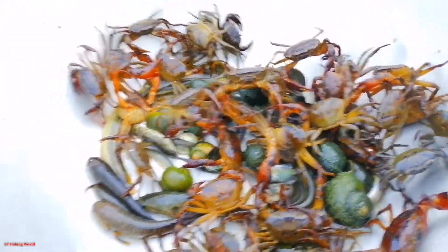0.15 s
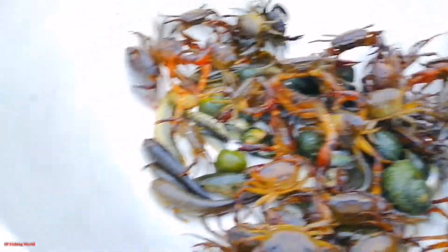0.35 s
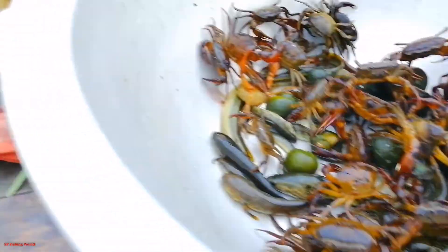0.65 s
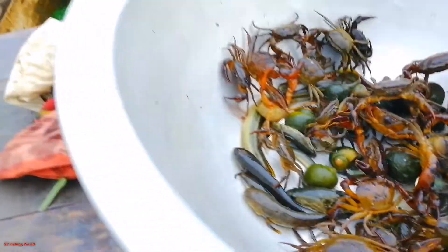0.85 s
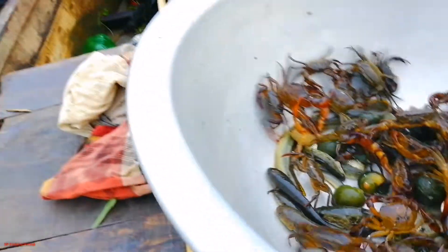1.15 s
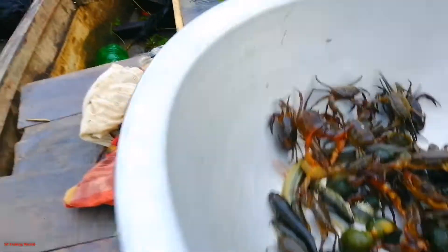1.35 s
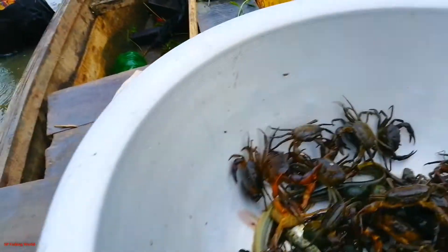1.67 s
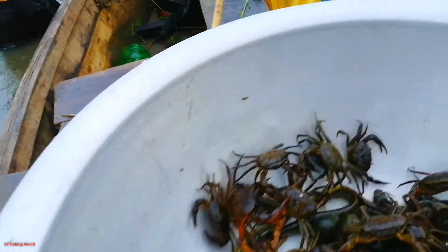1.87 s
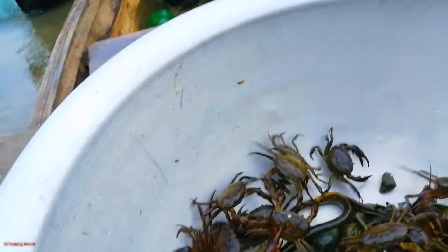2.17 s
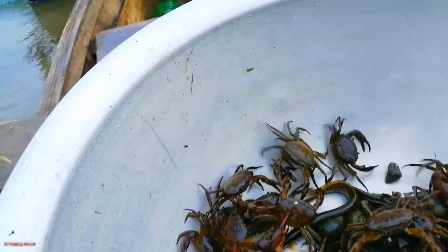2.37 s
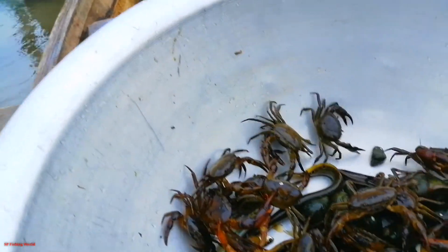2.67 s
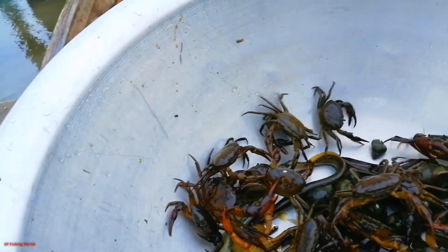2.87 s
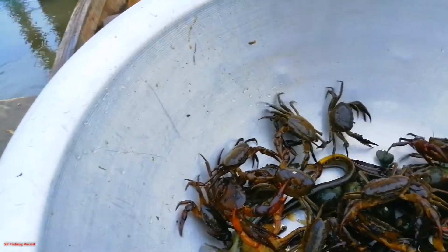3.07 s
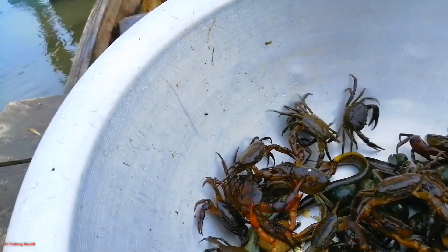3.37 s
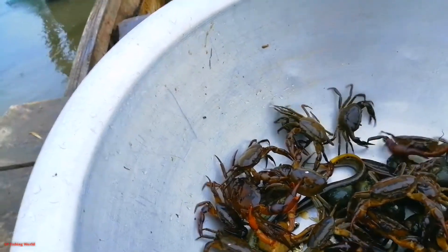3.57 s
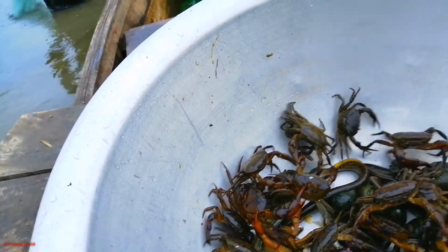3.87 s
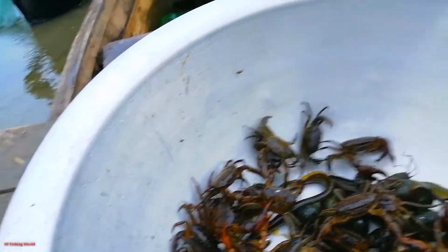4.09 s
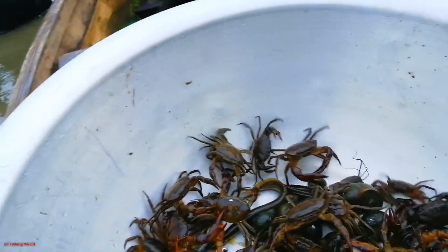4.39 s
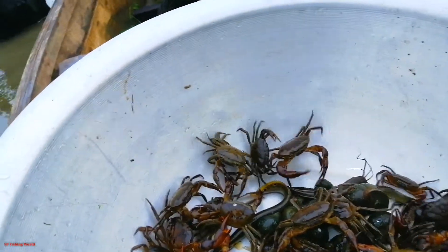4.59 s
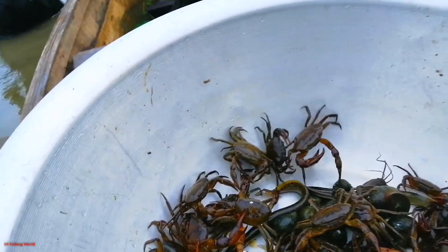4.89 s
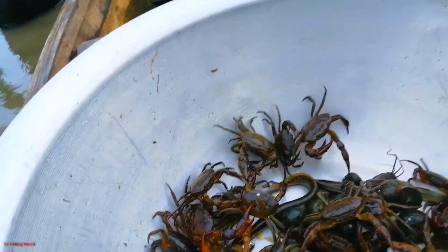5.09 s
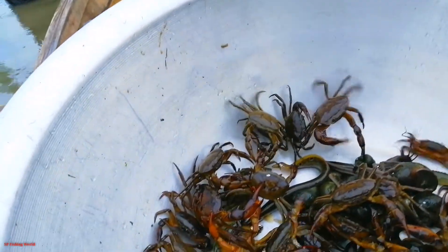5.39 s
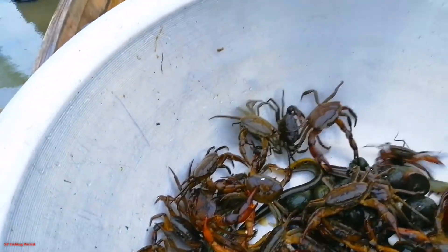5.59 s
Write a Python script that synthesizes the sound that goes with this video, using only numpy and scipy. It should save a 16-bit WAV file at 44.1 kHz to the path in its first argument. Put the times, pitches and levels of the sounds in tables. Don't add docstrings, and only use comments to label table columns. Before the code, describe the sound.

Live crabs tick and skitter inside a thin ringing tub while something heavy scrapes and bumps on wooden planks, then one hard slam rings.

```python
import sys
import numpy as np
from scipy import signal
from scipy.fft import rfft, irfft, dct, next_fast_len
from scipy.io import wavfile
from scipy.ndimage import uniform_filter1d

SR = 44100
rng = np.random.default_rng(int(sys.argv[2]) if len(sys.argv) > 2 else 0)


def volts(x):
    e = np.asarray(x, float) / 20
    return 10 ** e


def dump(signal):
    limited = np.clip(np.atleast_2d(signal).T, -1, 1)
    pcm = np.round(limited * 32767).astype(np.int16)
    wavfile.write(sys.argv[1], SR, pcm)


N = 253134


def rms_one(x):
    return x / np.sqrt(np.mean(x ** 2) + 1e-20)


def in_time(rows):
    s, *columns = np.transpose(rows)
    return [np.interp(np.arange(N) / SR, s, column) for column in columns]


def at_hz(points, hz):
    table_hz, values = np.array(points)[:, 0], np.array(points)[:, 1]
    return np.interp(np.log(np.maximum(hz, 1)), np.log(table_hz), values)


def panned(db):
    return volts(np.multiply.outer([.5, -.5], db))


def drift(rate):
    r = np.exp(-80 * np.pi * rate / SR)
    noise = rng.standard_normal(N // 40 + 2002)
    slow = signal.lfilter([1], [1, -2 * r, r * r], noise)[2000:]
    return np.interp(np.arange(N) / 40, np.arange(len(slow)), rms_one(slow))


def grains(per_s, spread_db, clump_db):
    signs = rng.choice([-1, 1], N)
    sizes = volts(spread_db * np.minimum(rng.exponential(1, N), 4)) * signs
    chance = per_s * volts(clump_db * drift(25.0)) / SR
    return sizes * (rng.random(N) < chance)


def evened(x, seconds):
    power = uniform_filter1d(np.mean(x ** 2, axis=0), int(seconds * SR))
    return x / np.sqrt(power + 0.096 * np.mean(x ** 2))


def coloured(x, spectrum):
    size = next_fast_len(N)
    gain = volts(at_hz(spectrum, np.fft.rfftfreq(size, 1 / SR)))
    return irfft(rfft(x, size) * gain, size)[..., :N]


def resonant(x, peaks):
    out = 0
    for k, (hz, width, level_db) in enumerate(peaks):
        r = np.exp(-np.pi * width / SR)
        poles = [1, -2 * r * np.cos(2 * np.pi * hz / SR), r * r]
        ring = signal.lfilter(np.array([1, 0, -1]) * (1 - r * r) / 2, poles, x)
        out = out + (-1) ** k * volts(level_db) * ring
    return out


def stereo(mid, side, alike):
    alike = np.clip(alike, -1, 1)
    shared = np.sqrt(1 + alike) * mid
    opposed = np.sqrt(1 - alike) * side * [[1], [-1]]
    return (shared + opposed) / np.sqrt(2)


# f/Hz, level/dB
WALL_MODES = [(1500, -27), (2200, -6), (2450, -6), (3150, -2), (3700, 0), (4300, -1.5), (5200, -1.5),
              (7000, -13.5)]
# f/Hz, level/dB, time to fall 60 dB (t60)/s
RIM_MODES = [(2482, -2, 0.14), (2440, -14.5, 0.1)]


def wall_modes(t60, count=130):
    hz = np.geomspace(1700, 7000, count) * rng.normal(1, 0.0036, count)
    decay = t60 * np.sqrt(3000 / hz) * volts(rng.normal(0, 1.0, count))
    rim_hz, rim_db, rim_t60 = np.transpose(RIM_MODES)
    gain = volts(np.r_[at_hz(WALL_MODES, hz), rim_db])
    hz, decay = np.r_[hz, rim_hz], np.r_[decay, rim_t60]
    t = np.arange(int(.2 * SR)) / SR
    ringing = np.exp(np.outer(2j * np.pi * hz - np.log(1000) / decay, t)).imag
    return hz, gain, ringing


def struck_at(gains, ringing, alike):
    mid, side = rng.standard_normal((2, len(gains)))
    return stereo(mid, side, alike) * gains @ ringing


def wall_strikes(rows, t60, shell):
    hz, gain, ringing = wall_modes(t60)
    length = ringing.shape[1]
    out, t = np.zeros((2, N + length)), np.arange(length) / SR
    bright = signal.butter(2, [4500, 10500], "band", fs=SR, output="sos")
    chatter_s, chatter_db = .025, -9
    for s, peak_db, ring_hz, pan_db, crack_db in rows:
        apart = np.log(hz / ring_hz)
        focus = .15 if shell else .7
        focus = focus + 0.56 * np.exp(-(apart / 0.16) ** 2) + 1.13 * np.exp(-(apart / 0.058) ** 2)
        ring = struck_at(gain * focus, ringing, 0.23)
        ring = ring * (1 + 1.17 * volts(-60 * t / 0.055)) * np.clip(t / 0.00076, 0, 1)
        touches = np.zeros(length)
        if shell:
            later = rng.random(size=4)
            touches[(later * chatter_s * SR).astype(int)] = volts(-5.5 + chatter_db * later)
        touches[0] = 1
        ring = signal.oaconvolve(ring, touches[None])[:, :length]
        crack = signal.sosfilt(bright, rng.standard_normal((2, length))) * volts(-60 * t / .035)
        strike = ring / np.abs(ring).max() + volts(crack_db - 3.0) * crack
        at = round(s * SR)
        out[:, at:at + length] += volts(peak_db + 1.0) * strike * panned(pan_db)[:, None]
    return out[:, :N]


def blows(rows, rise_cycles, split, wobble):
    out, t = np.zeros((2, N + SR)), np.arange(SR // 4) / SR
    place_db = in_time(DRAG_EFFORT)[1]
    for s, peak_db, hz, t60 in rows:
        pair = np.sin(2 * np.pi * hz * t) + .5 * np.sin(2 * np.pi * hz * (1 + split) * t)
        shape = pair * (1 - np.exp(-(t * hz / rise_cycles) ** 2)) * volts(-60 * t / t60)
        flutter = rms_one(uniform_filter1d(rng.standard_normal(len(t)), size=int(.02 * SR)))
        shape = shape * (1 + wobble * flutter * np.clip(t / .015, 0, 1))
        at = round(s * SR)
        gains = volts(peak_db) * panned(place_db[at])
        out[:, at:at + len(t)] += np.outer(gains, shape / np.abs(shape).max())
    return out[:, :N]


# t/s, level/dB, skidding re ticking/dB, left-right/dB, busiest spot f/Hz
LEG_BUSTLE = [(0.0, -46, 0.5, -3, 2856), (0.3, -48.5, -6.5, -4, 2835), (0.7, -51, -3.5, -5, 2854),
              (0.93, -47.5, -7.5, -9, 2986), (1.15, -54, -6, -6, 3300), (1.3, -42.5, -3, -6.5, 3277),
              (1.75, -45.5, -2, -3, 3090), (2.1, -37.5, -6, -4, 3193), (2.36, -48.5, -1, -1.5, 3221),
              (3.2, -43.5, -7, 0, 3245), (3.38, -42.5, -8, -1.5, 3180), (3.5, -34.5, -11.5, -2.5, 3280),
              (3.76, -37, -9.5, -3.5, 2938), (3.99, -49, -3, -4, 3256), (5.1, -52, -5.5, -5, 3122),
              (5.5, -41.5, -6.5, -6, 3320), (5.58, -46.5, -1, -5.5, 3185), (5.74, -46.5, -2.5, -6, 3315)]
# f/Hz, width/Hz, level/dB
WALL_HUM = [(537, 79, -0.5), (588.6, 59, 1), (648, 34, -4.5), (854, 27, -14.5)]
# f/Hz, level per Hz/dB
SKID_COLOUR = [(2350, -75), (4000, -5), (6180, -7), (7440, -8.5), (8450, -12.5), (9220, -11.5),
               (13100, -26), (16000, -37)]


def scrabble():
    level_db, skid_db, pan_db, busiest_hz = in_time(LEG_BUSTLE)
    hz, gain, ringing = wall_modes(t60=0.041)
    ticking = grains(1400.0, spread_db=3.5, clump_db=1.5)
    spots_hz = np.geomspace(2400, 4200, 9)
    wander = .11 * rng.standard_normal(N) + .03 * drift(8.0) - .035
    dealt = np.clip(np.searchsorted(spots_hz, busiest_hz * np.exp(wander)), 0, 8)
    ring = 0
    for k, spot_hz in enumerate(spots_hz):
        focus = .15 + np.exp(-(np.log(hz / spot_hz) / .09) ** 2)
        focus[-len(RIM_MODES):] += 0.24
        spot_ring = struck_at(gain * focus, ringing, 0.079)
        ring = ring + signal.oaconvolve((ticking * (dealt == k))[None], spot_ring)[:, :N]
    ring = signal.sosfilt(signal.butter(4, 2280, "high", fs=SR, output="sos"), ring)

    rough = np.sqrt(signal.lfilter([.004], [1, -.996], ticking ** 2) + 0.025)
    hiss = coloured(rough * stereo(*rng.standard_normal((2, N)), 0.017), SKID_COLOUR)

    shuffle = [grains(600.0, spread_db=4.0, clump_db=2.0) for _ in range(2)]
    hum = stereo(*resonant(shuffle, WALL_HUM), 1.0)
    hum_gain = volts(-70 + level_db - level_db.mean())
    shaking = volts(in_time(DRAG_EFFORT)[0]) + 0.59 * strokes()[0]
    hum_gain = hum_gain + volts(-5) * shaking

    bright = volts(2.47 * drift(10.1)) * evened(ring, 0.1)
    bright = bright + volts(skid_db + 2.16 * drift(26.4)) * evened(hiss, 0.12)
    return (volts(level_db + 4.0) * bright + hum_gain * evened(hum, 0.28)) * panned(pan_db)


# t/s, level/dB, left-right/dB of the place
DRAG_EFFORT = [(0.0, -52, 6), (0.38, -60.5, -7), (0.8, -59, 6), (1.19, -49, -21), (1.3, -37.5, -10),
               (1.48, -39.5, -12), (1.54, -46, -8.5), (1.76, -48, -12.5), (1.86, -42, -8),
               (1.984, -36.5, -4.5), (2.3, -57, -2), (2.55, -55.5, 13.5), (3.26, -56.5, -1.5),
               (3.6, -58.5, -4), (4.52, -59.5, -13.5), (4.89, -50.5, -17.5), (5.27, -61.5, -14),
               (5.74, -51, -14)]
# f/Hz, width/Hz, level/dB
PLANK_MODES = [(872, 164, -6), (1054, 69, 0), (1250, 170, -11), (1637, 156, 4), (1703, 316, -1),
               (2204, 17, -7)]
# f/Hz, width/Hz, level/dB
HULL_MODES = [(207, 29, 1.5), (259.4, 70, 1.5), (314, 71, 1.5), (432, 60, -3)]


def drag():
    rasp_db, t = in_time(DRAG_EFFORT)[0], np.arange(N) / SR
    skim_db = -10.5 * np.exp(-((t - 1.2) / 0.25) ** 2)
    settle_db = 10 * np.exp(-((t - 2.02) / 0.22) ** 2)
    rumble_db = rasp_db - 5.5 + settle_db + skim_db
    body, top = strokes()
    slips = np.array([grains(900.0, spread_db=2.5, clump_db=3.0) for _ in range(2)])

    broad = signal.sosfilt(signal.butter(2, [700, 2300], "band", fs=SR, output="sos"), slips)
    rasp = evened(stereo(*(resonant(slips, PLANK_MODES) + 0.36 * broad), 0.25), 0.13)

    grit_colour = [(1100, -40), (1800, -21), (2600, -5), (3400, 0.0)] + list(SKID_COLOUR[2:])
    grit = slips + 0.49 * rng.standard_normal((2, N))
    grit = evened(coloured(grit, grit_colour), 0.05)

    thuds = resonant(slips[::-1], [(260, 265, 0)])
    rumble = evened(stereo(*resonant(thuds, HULL_MODES), 0.48), .07)

    rasp_gain = volts(rasp_db + 3.3 * drift(5.9)) + body
    rumble_gain = volts(rumble_db + 2.0) + 0.24 * body
    return (rasp_gain * rasp + top * grit + rumble_gain * rumble) * panned(-4.5)[:, None]


# t/s, level/dB
WIND_LEVEL = [(0.0, -55.5), (0.78, -67), (1.29, -71), (2.62, -60), (3.07, -54.5), (3.21, -63.5),
              (3.84, -68), (3.97, -63), (5.1, -54), (5.4, -66), (5.74, -62.5)]
# f/Hz, level per Hz/dB
WIND_TONE = [(12, -67), (20, 0.5), (59, 2), (91, -1.5), (166, -8.5), (259, -27.5), (310, -14), (390, -85)]


def wind():
    lumps = volts(1.58 * np.array([drift(4.1), drift(12.0)]))
    flutter = rms_one(lumps * coloured(rng.standard_normal((2, N)), WIND_TONE))
    return volts(in_time(WIND_LEVEL)[0] + 8.0) * flutter * volts([[-2.5], [2.5]])


# t/s, peak level/dB, f/Hz, t60/s
WOOD_BUMPS = [(.05, -39, 187, 0.062), (1.07, -48, 134, 0.047), (1.238, -29.5, 183, 0.038),
              (1.245, -30.5, 393, 0.03), (1.325, -40, 247, 0.066), (1.405, -34.5, 236, 0.27),
              (1.44, -48, 243, 0.078), (1.508, -26.5, 453, 0.1), (1.555, -26, 370, 0.056),
              (1.6, -28, 240.4, 0.13), (1.64, -30.5, 349, 0.17), (1.793, -21, 354, 0.064),
              (1.81, -25.5, 122, 0.083), (1.877, -20.5, 320, 0.057), (1.897, -23.5, 267, 0.061),
              (1.928, -28, 288, 0.019), (1.962, -16.5, 279, 0.054), (1.98, -22, 599, 0.17),
              (2.004, -13.5, 250, 0.025), (2.036, -20.5, 256, 0.03), (2.064, -22, 237, 0.023),
              (2.23, -27.5, 273, 0.036), (2.355, -32.5, 242, 0.013), (2.452, -27, 276.4, 0.046),
              (2.48, -37.5, 257, 0.1), (2.817, -44.5, 584, 0.038), (3.48, -41, 305, 0.092),
              (4.715, -28, 269, 0.024)]


def bumps():
    return blows(WOOD_BUMPS, rise_cycles=1.41, split=0.211, wobble=.2)


# t/s, peak level/dB, loudest f/Hz, left-right/dB
LEG_TICKS = [(0.0717, -36, 3020, -0.5), (0.0893, -31, 2600, -4.0), (0.1544, -33, 2930, -1),
             (0.2994, -35, 3120, -4.0), (0.3394, -34, 3800, -6), (0.5294, -36, 2850, -5.5),
             (0.5711, -35, 3040, -7.0), (0.6794, -34, 2830, -8), (0.7996, -38, 3620, -6.5),
             (0.8315, -38, 3180, -6), (0.8804, -36, 2500, -6.0), (0.9144, -37, 3220, -7.0),
             (0.954, -34, 3290, -6.0), (1.1423, -43, 3290, -6.5), (1.1657, -40, 3360, -6.0),
             (2.3241, -33, 3470, -1), (2.382, -30, 3010, -1.0), (2.4982, -34, 3100, -3.5),
             (2.5994, -33, 3460, 0.5), (2.8802, -32, 3120, 1.0), (2.9364, -30, 2630, -1.0),
             (3.0405, -33, 3170, -0.5), (3.0764, -28.5, 3180, 0.5), (3.0999, -27, 3700, 2),
             (3.1953, -28, 2480, -5), (3.3717, -29, 3270, -2), (3.451, -21, 3600, -5.5),
             (3.4654, -24, 3180, -7.0), (3.479, -18, 3090, -5.5), (3.915, -25, 3130, -2.5),
             (4.1325, -33, 2930, -4.0), (4.2625, -29, 2470, -6), (4.3789, -31, 3220, -3.5),
             (4.4023, -32, 3200, -4.5), (4.6167, -33, 3250, -4.0), (4.794, -33, 3260, -6),
             (4.812, -35, 3240, -4.5), (5.1537, -32, 2520, -7.0), (5.2394, -37, 3680, -5.0),
             (5.2664, -37, 3600, -5.0), (5.2859, -27, 3600, -4.5), (5.3244, -30, 3940, -6.0),
             (5.3453, -30, 3140, -2.0), (5.4056, -24, 3070, -3.5), (5.4344, -23, 3210, -2),
             (5.4989, -22, 3330, -6.5), (5.5297, -24, 4180, -7.5), (5.5494, -23, 3440, -7.0),
             (5.632, -28, 3300, -5.0), (5.7344, -30, 4010, -8)]


def ticks():
    crack_db = -14
    rows = [tuple(row) + (crack_db,) for row in LEG_TICKS]
    return volts(-3.0) * wall_strikes(rows, t60=0.07, shell=True)


# t/s, peak level/dB, f/Hz, t60/s
HARD_KNOCKS = [(.22, -45, 847, 0.066), (.41, -46, 900, 0.085), (1.555, -14.5, 930, 0.047),
               (1.578, -18, 1095, 0.046), (1.6, -26, 1590, 0.23), (1.5, -42, 2400, 0.081),
               (1.78, -31, 1210, 0.026), (1.783, -30.5, 623, 0.13), (1.436, -29.5, 2090, .05),
               (1.51, -26, 2300, .06), (1.405, -25, 1300, .05), (2.935, -44, 1535, 0.3),
               (2.965, -47, 1535, .25), (3.4, -45, 1540, 0.35), (3.39, -42, 1150, 0.041),
               (3.475, -49, 1570, 0.42), (3.545, -39.5, 599, 0.15), (3.69, -44, 601, .3),
               (4.283, -40.5, 1200, 0.014), (4.285, -31.5, 2482, 0.11), (4.6, -49, 774, 0.04),
               (5.1, -45, 2482, .1), (4.325, -44, 2482, .08), (4.755, -44, 2482, .1), (3.14, -41, 2300, .3),
               (4.755, -39, 270, 0.036), (4.655, -42, 2482, 0.13), (4.683, -43, 1500, 0.033),
               (4.7135, -41, 1500, 0.034), (4.7145, -20.5, 1640, 0.02), (4.7155, -34, 2040, 0.031),
               (5.18, -42.5, 1720, 0.033), (5.012, -39.5, 4290, 0.18), (5.16, -42.5, 2482, 0.13),
               (4.693, -39, 790, .04), (5.02, -46, 2482, .2), (5.185, -43, 2482, .1), (5.22, -44, 2482, .2),
               (5.362, -44, 2482, .15), (1.566, -22, 1010, .05), (1.596, -23, 1240, .04),
               (3.03, -50, 1535, .1)]


def knocks():
    return blows(HARD_KNOCKS, rise_cycles=0.7, split=0.011, wobble=.35)


# t/s, peak level/dB, loudest f/Hz, left-right/dB
SHELL_TAPS = [(0.2345, -35, 2700, 10), (0.4, -41, 3350, -18.5), (0.499, -33.5, 2860, -14.5),
              (0.77, -38, 2750, -4), (1.5085, -23, 1970, 2), (1.5596, -22, 3020, -2),
              (1.712, -27, 2150, -20.5), (1.7828, -25.5, 2250, 8), (1.8768, -28.5, 2140, -5),
              (1.974, -15.5, 2930, -0.5), (2.094, -20, 3160, 0), (2.3597, -30, 3230, -7),
              (2.544, -26, 3200, 2), (2.7785, -29, 3320, 2), (0.2793, -32, 3420, -4),
              (3.435, -25, 3170, -6), (3.4949, -17, 3350, -8), (3.5324, -19, 3370, -8),
              (3.5676, -22.5, 3000, -14), (3.717, -21, 3060, -10), (3.7552, -20.5, 2810, -5),
              (3.8906, -23.5, 3150, 4), (3.9786, -31.5, 3260, -4), (5.2018, -29.5, 3410, -7),
              (5.2975, -25.5, 3800, -5), (5.3873, -32, 2500, -6), (5.4514, -22.5, 3140, -5),
              (3.602, -37, 3100, -5), (5.681, -33, 3800, -2)]


def shell_taps():
    crack_db = -17
    rows = [tuple(row) + (crack_db,) for row in SHELL_TAPS]
    return wall_strikes(rows, t60=0.12, shell=True)


# t/s, peak level/dB, f/Hz, left-right/dB
SMALL_CRACKLES = [(0.636, -38, 1680, -10), (0.697, -38, 2060, -10), (1.049, -36, 1250, -10.0),
                  (1.196, -38, 877, -9.0), (1.24, -31, 600, -5.5), (1.287, -27, 1290, -3.5),
                  (1.326, -25, 1730, -1.0), (1.344, -26, 600, -6), (1.377, -26, 1810, -3.5),
                  (1.832, -32, 861, 0.0), (1.855, -27, 603, 0.0), (1.876, -26, 600, -4),
                  (1.913, -24, 600, 6), (1.974, -22, 600, -4.0), (2.743, -45, 926, -4.5),
                  (2.776, -43, 915, -3.5), (3.645, -35, 2010, -8), (3.753, -34, 1880, -9),
                  (3.926, -43, 1060, -3.0), (4.058, -39, 1850, -7.5), (4.214, -42, 2160, -7),
                  (4.261, -34, 1070, -3), (4.456, -41, 1980, 1.5), (4.562, -47, 856, -5.0),
                  (4.613, -39, 1680, -12), (4.64, -41, 802, -8.0), (4.683, -35, 1520, -13.0),
                  (4.741, -38, 2130, -5.5), (4.783, -37, 700, -8.5), (4.802, -39, 740, -6.0),
                  (4.823, -33, 802, -7), (4.865, -38, 1670, -8.5), (4.881, -34, 1780, -8.0),
                  (4.906, -37, 2150, -9.0), (5.286, -44, 1920, -3.5), (5.309, -44, 600, -2.0),
                  (5.513, -32, 600, -3), (5.554, -36, 600, -7.0), (5.652, -40, 813, -6)]


def crackles():
    out, t = np.zeros((2, N + SR)), np.arange(SR // 20) / SR
    for s, peak_db, hz, pan_db in SMALL_CRACKLES:
        burst = stereo(*rng.standard_normal((2, len(t))), .7) * volts(-60 * t / .03)
        click = resonant(burst, [(1500, 1700, 0)])
        shape = resonant(burst, [(hz, hz / 3.0, 0)]) + 0.13 * click
        shape = shape / np.abs(shape).max()
        at = round(s * SR)
        out[:, at:at + len(t)] += volts(peak_db - 2) * shape * panned(pan_db)[:, None]
    return out[:, :N]


# t/s, peak level/dB,
# loudest f/Hz, left-right/dB, crack re ring/dB
CLAW_SNAPS = [(1.02, -37, 2440, -15, -2), (1.0405, -34, 3600, -5, 6.5), (2.815, -16, 3470, -2, -17),
              (3.265, -8.5, 3640, 0, -21), (3.6447, -25, 3140, -5, 6), (4.242, -31, 3080, -4, -8),
              (4.2822, -30.5, 2500, -2, 1.5), (5.5945, -18, 3120, -6, -13),
              (4.4562, -19.5, 3280, -7, -13.5), (4.7132, -48, 2100, -13, 7), (4.8653, -29.5, 3870, -7, -5),
              (5.0108, -36, 4400, -7, -6)]


def snaps():
    return wall_strikes(CLAW_SNAPS, t60=0.12, shell=False)


# t/s, length/s, level/dB, bright top re level/dB
SINGLE_SCRAPES = [(1.024, 0.055, -59, 23), (1.279, 0.013, -37.5, -25.5), (1.32, 0.042, -33, -2),
                  (1.376, 0.013, -35, 0), (1.398, 0.017, -33.5, -19), (1.424, .02, -37.5, 2),
                  (1.494, 0.017, -28.5, -6), (1.556, 0.095, -25.5, -4.5), (1.702, 0.032, -33, -4),
                  (1.786, 0.019, -35.5, -7), (1.847, 0.038, -49, -8), (1.974, 0.0084, -35, 7),
                  (2.058, .14, -35.5, 3.5), (3.084, 0.043, -57, 22), (3.266, 0.072, -51.5, 20),
                  (4.071, 0.027, -56, 15.5), (4.702, 0.025, -34.5, -4), (4.769, 0.1, -50, 4.5),
                  (5.389, 0.164, -59, 27.5)]


def strokes():
    t, body, top = np.arange(N) / SR, np.zeros(N), np.zeros(N)
    for s, length, start_db, top_db in SINGLE_SCRAPES:
        rise = 0.0058 + length * (.1 if length < .1 else .4)
        over = np.maximum(t - s - length, 0)
        edge = np.clip((t - s) / rise, 0, 1) * volts(-60 * over / (0.017 + 0.4 * length))
        level = edge * volts(np.interp(t, [s, s + length], [start_db, start_db - 2.5]))
        body = body + level
        top = top + level * volts(top_db)
    return body, top


# t/s, level/dB
SLAM_HITS = [
    (3.266, 0.0),
    (3.312, -12),
    (3.325, -13.5),
    (3.345, -17.5),
]
# f/Hz, peak level/dB, t60/s
TUB_MODES = [(268, -32, 0.079), (470, -40, 0.63), (554.6, -25, 0.19), (646, -34, .2), (894, -32.5, 0.2),
             (1250, -21.5, 0.013), (2447, -19, .15), (2495, -13.5, 0.14), (2568, -24, 0.11),
             (3640, -21, .05)]


def slam():
    rows = [(s, db + peak_db, hz, t60) for s, db in SLAM_HITS for hz, peak_db, t60 in TUB_MODES]
    return blows(rows, rise_cycles=0.81, split=0.0039, wobble=.35)


def late(x, port, size):
    out = x.copy()
    out[port] = np.r_[np.zeros(size), x[port, :-size]]
    return out


# f/Hz, share/0-1
DROPPED_SHARE = [(500, .02), (2200, .12), (7600, .15), (9000, .24), (10200, .48), (13000, .74),
                 (15300, .92), (15400, 1)]


def thinned(x):
    frame, first = 1024, 71
    window = signal.windows.kaiser_bessel_derived(2 * frame, 4 * np.pi)
    padded = np.pad(x, ((0, 0), (2 * frame - first, 3 * frame)))
    starts = np.arange(0, N + 2 * frame, frame)
    pieces = padded[:, starts[:, None] + np.arange(2 * frame)]
    a, b, c, d = np.split(pieces * window, 4, axis=2)
    lines = dct(np.dstack([-c[..., ::-1] - d, a - b[..., ::-1]]), type=4, norm="ortho")

    power = np.sum(lines ** 2, axis=0) + 1e-20
    patches = uniform_filter1d(rng.standard_normal(power.shape), size=9)
    patches = rms_one(uniform_filter1d(patches, size=2, axis=0))
    merit = np.log(power / uniform_filter1d(power, size=32) ** .8) + 2.5 * patches
    share = at_hz(DROPPED_SHARE, (np.arange(frame) + .5) * SR / (2 * frame))
    kept = merit.argsort(axis=0).argsort(axis=0) >= share * len(starts)

    treble = np.sum(np.diff(pieces) ** 2, axis=0)[:, :-127]
    steps = treble.reshape(len(starts), 15, 128).sum(axis=2) + 1e-9
    jump = np.max(steps[:, 2:] / (steps[:, :-2] + steps[:, 1:-1]) * 2, axis=1)
    kept[jump > volts(2 * 9)] = share < .95

    p, q = np.split(dct(lines * kept, type=4, norm="ortho"), 2, axis=2)
    frames = np.dstack([q, -q[..., ::-1], -p[..., ::-1], -p]) * window
    out = np.zeros((2, len(starts) + 1, frame))
    out[:, :-1] += frames[..., :frame]
    out[:, 1:] += frames[..., frame:]
    return out.reshape(2, -1)[:, 2 * frame - first:][:, :N]


def scene():
    tub = scrabble() + ticks() + shell_taps() + snaps() + slam()
    planks = drag() + bumps() + knocks() + crackles()
    return late(tub, 0, 12) + late(planks, 1, 5) + wind()


def band_limit(x):
    return signal.sosfilt(signal.butter(12, 16430, fs=SR, output="sos"), x)


def record(dry):
    mix = thinned(dry)
    return band_limit(mix)


dry = scene()
out = record(dry)
dump(out)
```